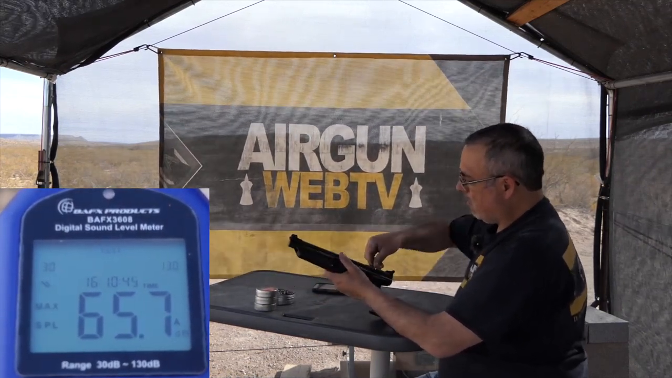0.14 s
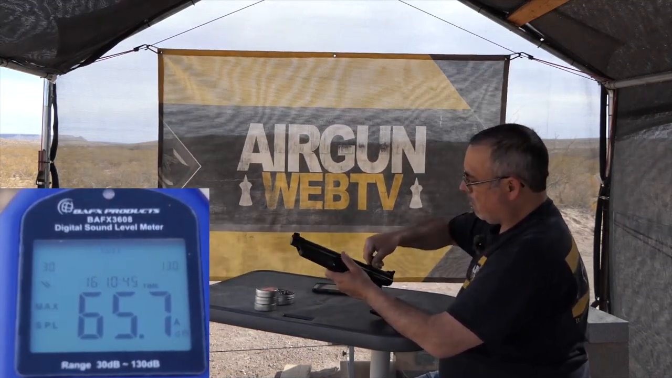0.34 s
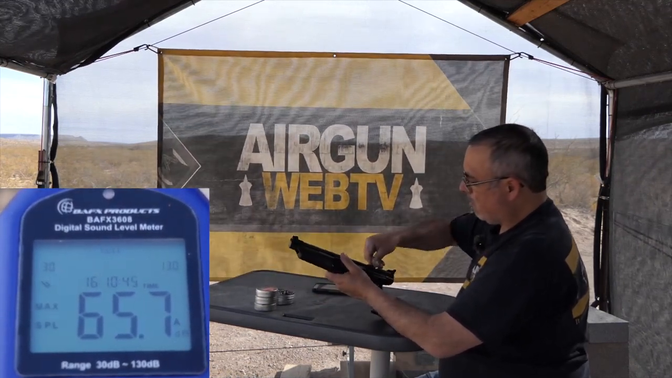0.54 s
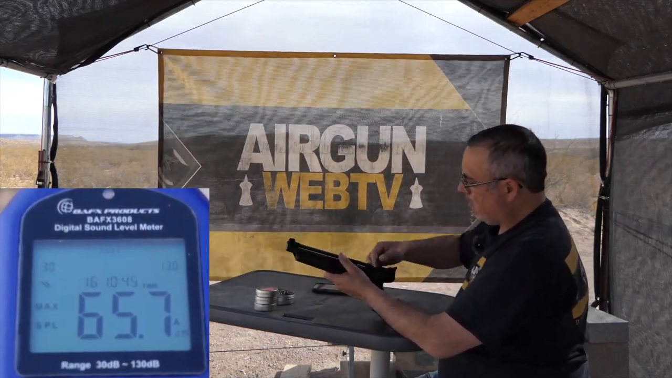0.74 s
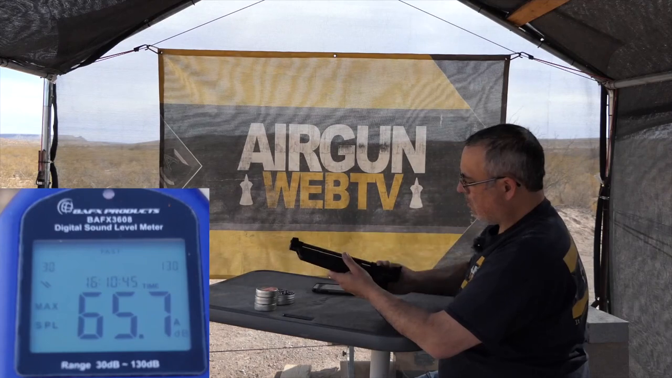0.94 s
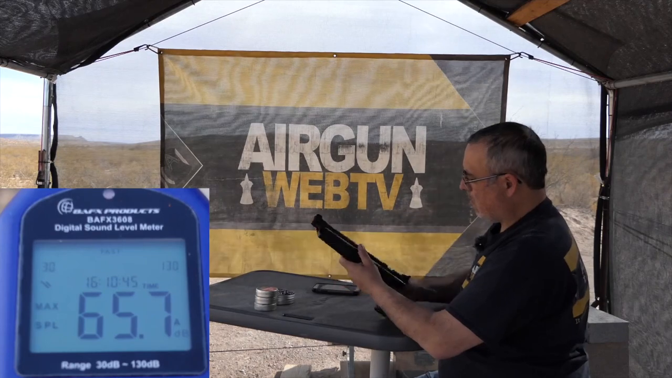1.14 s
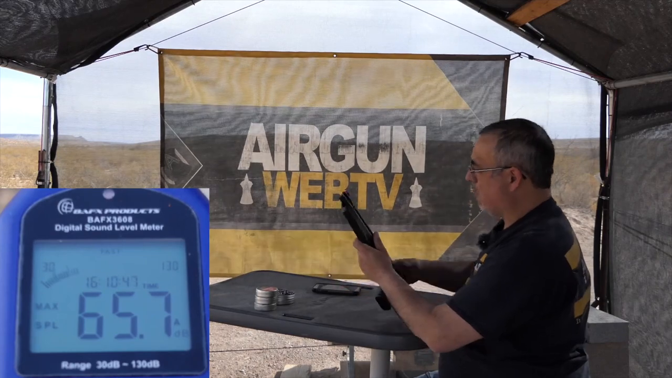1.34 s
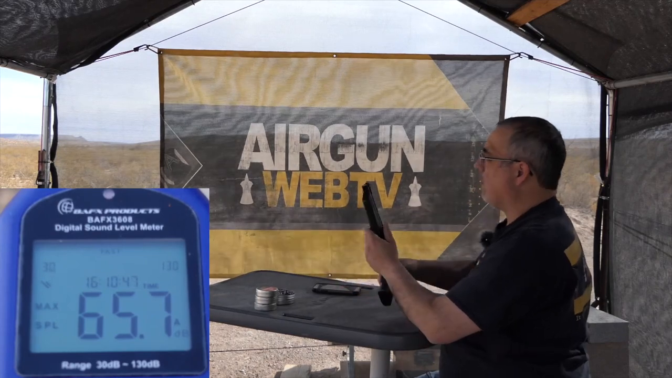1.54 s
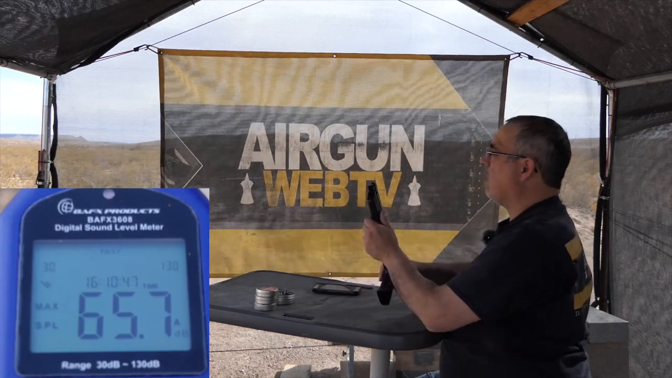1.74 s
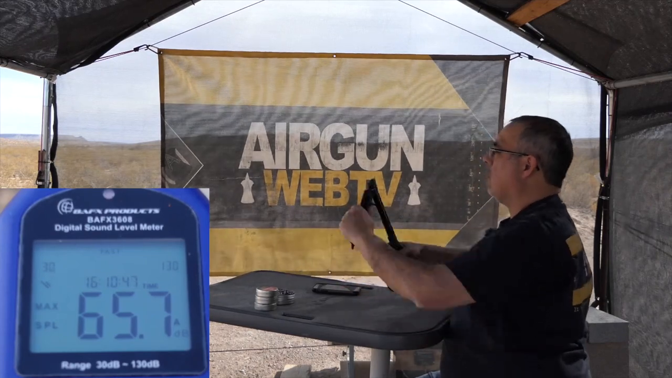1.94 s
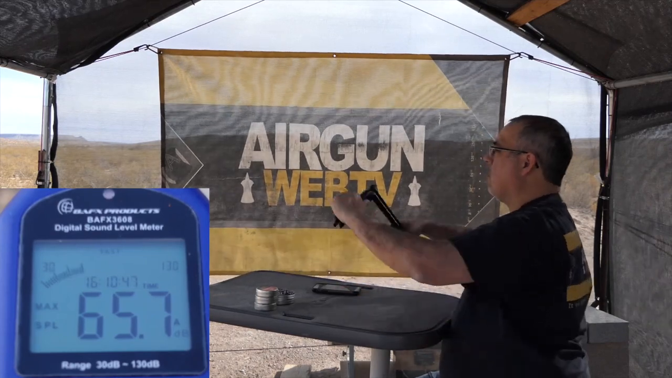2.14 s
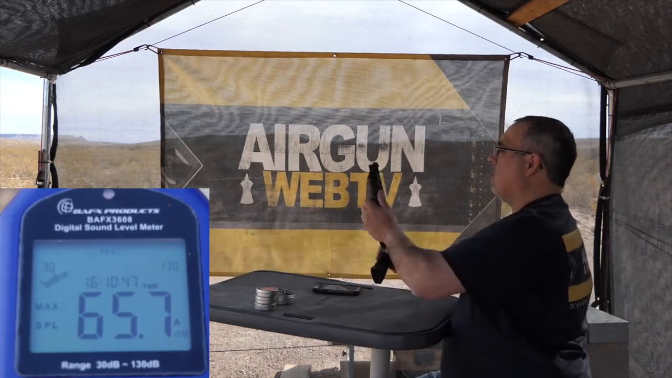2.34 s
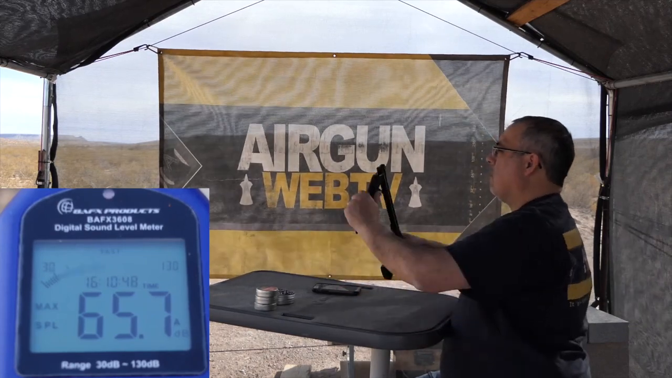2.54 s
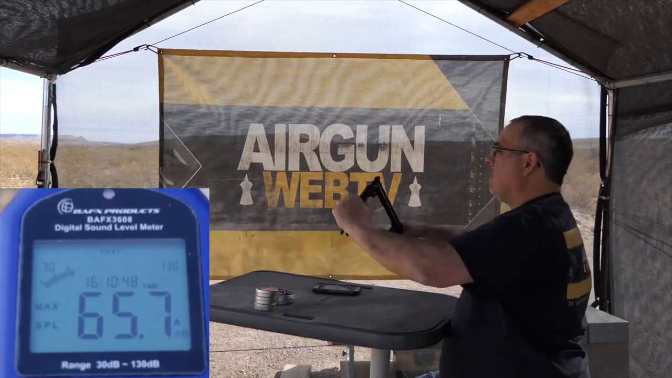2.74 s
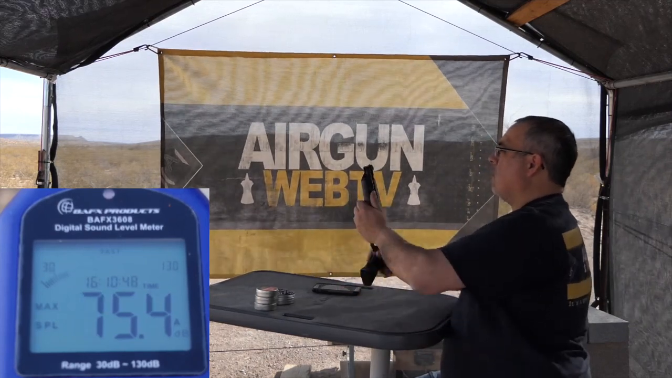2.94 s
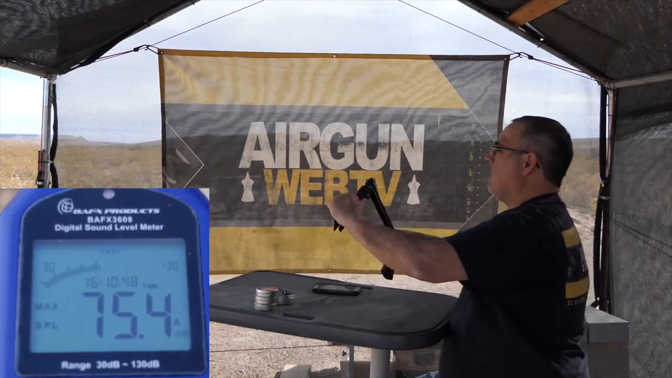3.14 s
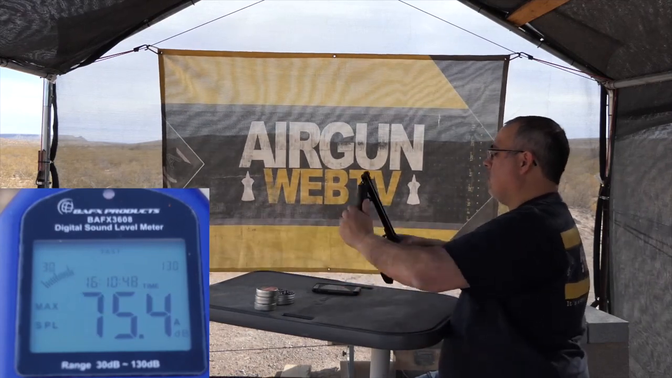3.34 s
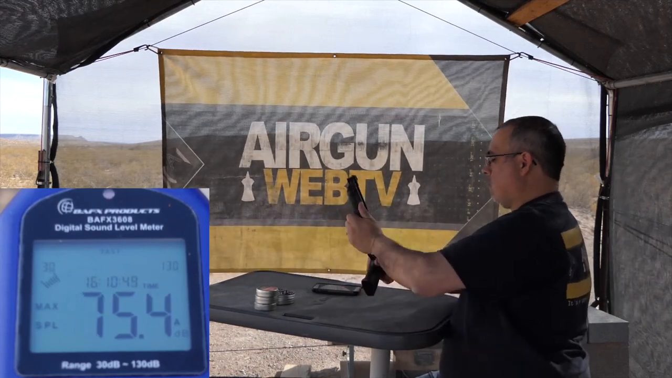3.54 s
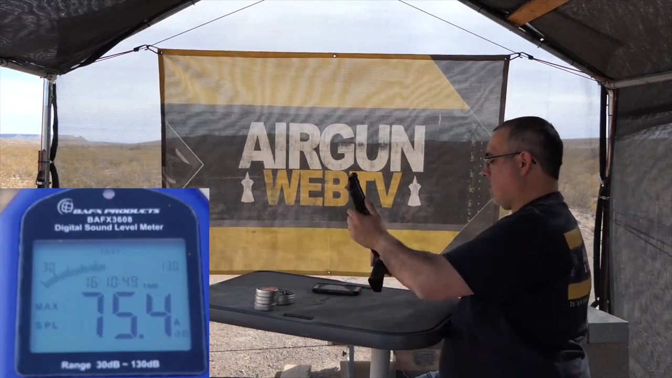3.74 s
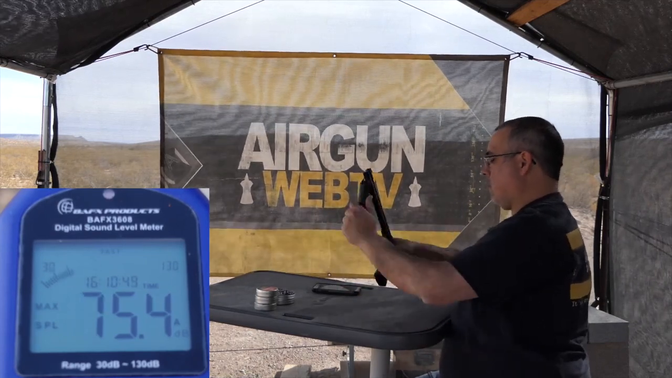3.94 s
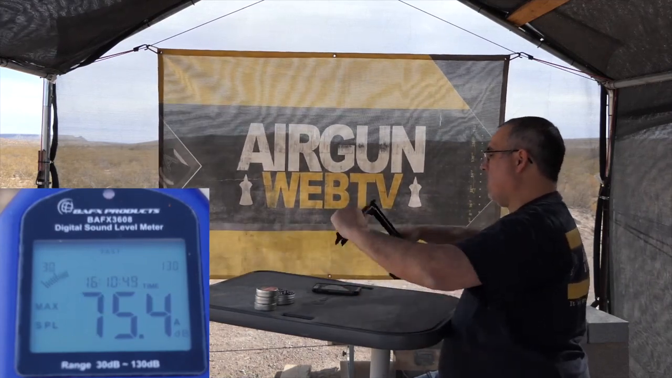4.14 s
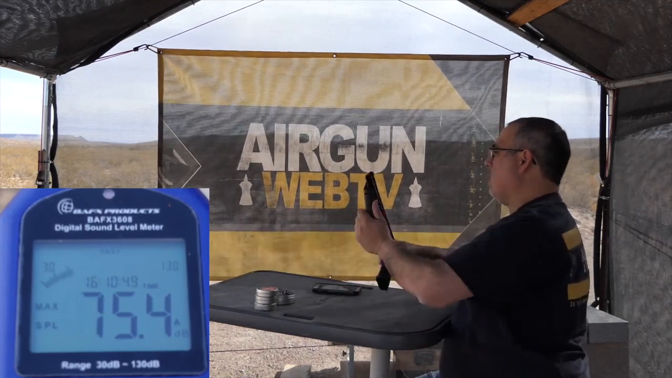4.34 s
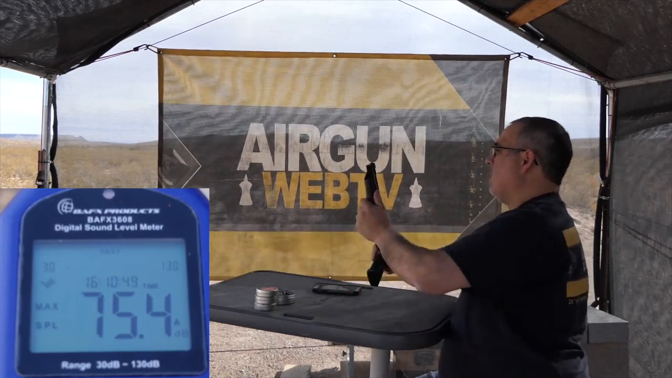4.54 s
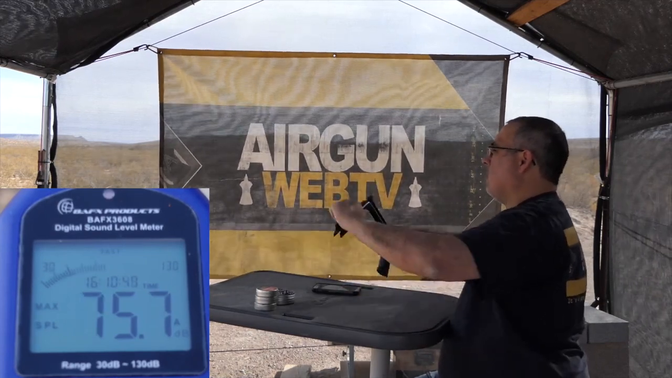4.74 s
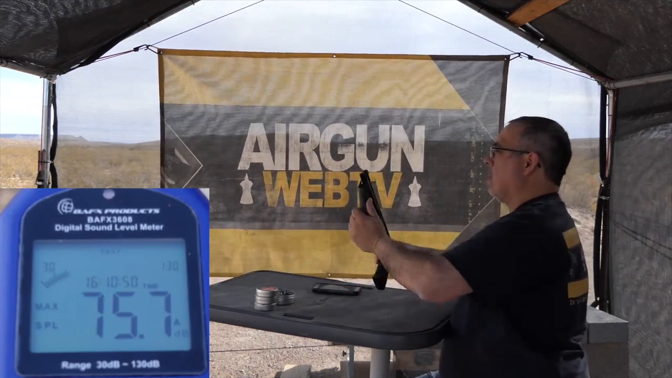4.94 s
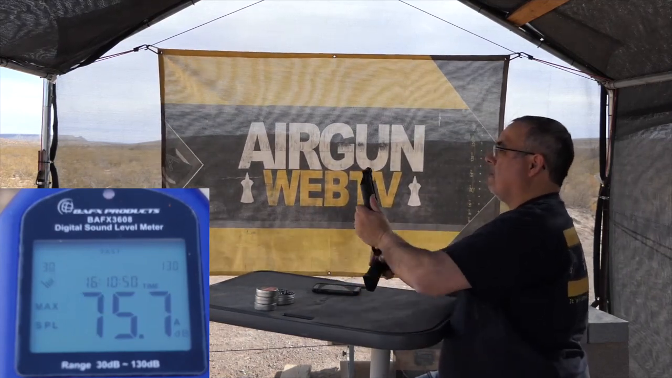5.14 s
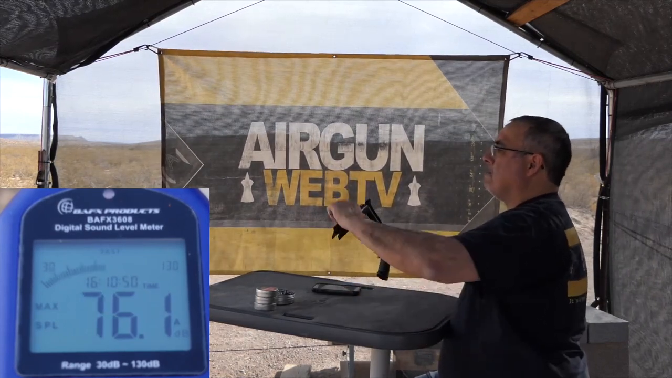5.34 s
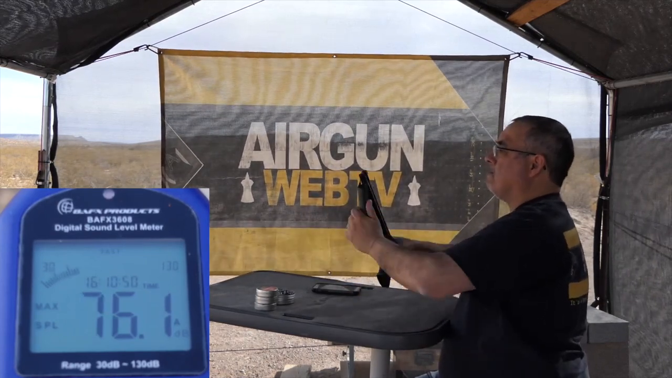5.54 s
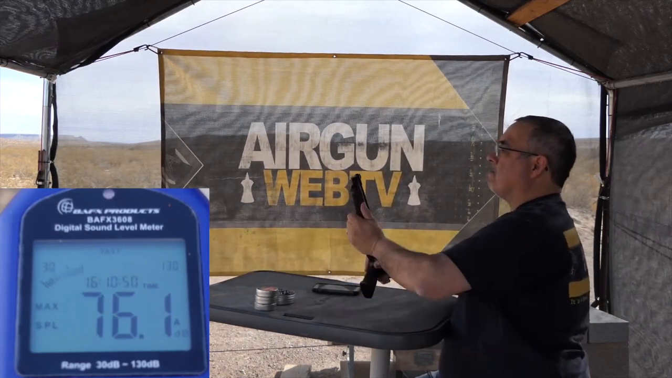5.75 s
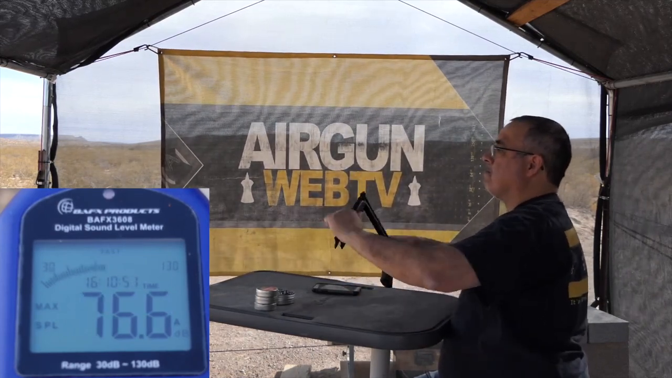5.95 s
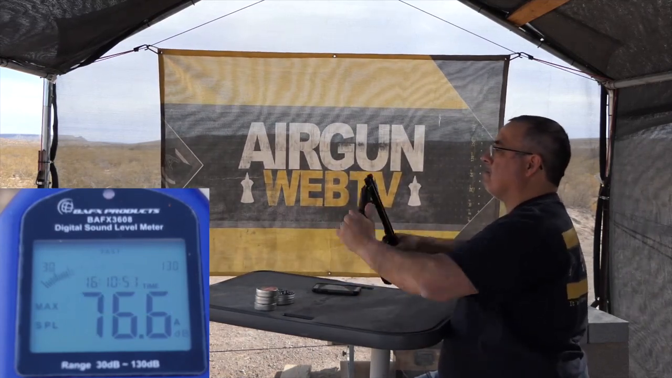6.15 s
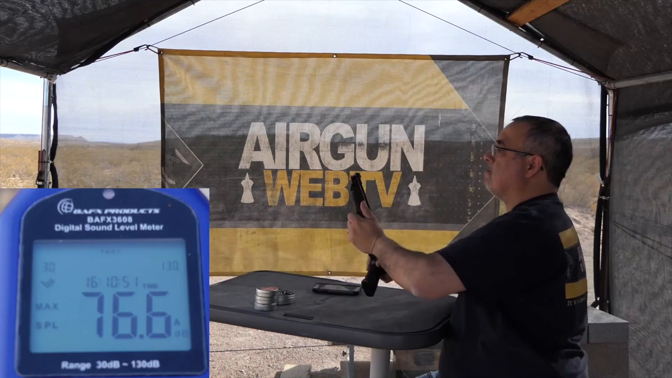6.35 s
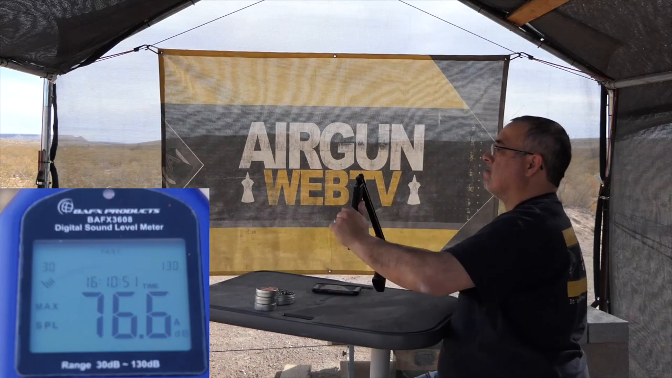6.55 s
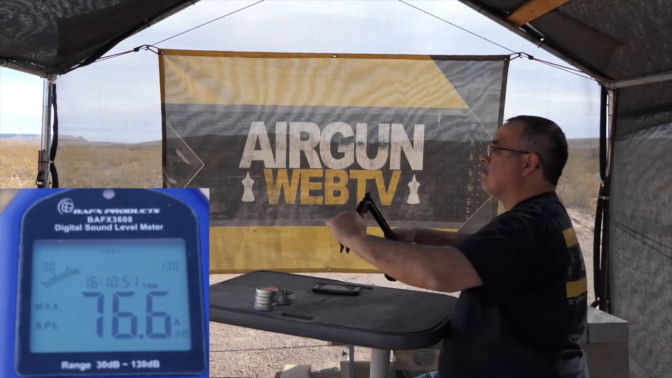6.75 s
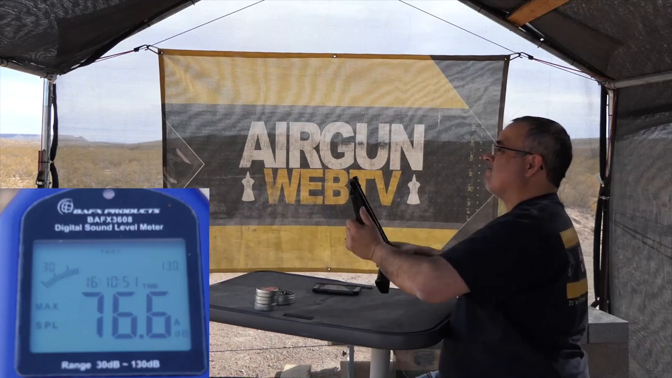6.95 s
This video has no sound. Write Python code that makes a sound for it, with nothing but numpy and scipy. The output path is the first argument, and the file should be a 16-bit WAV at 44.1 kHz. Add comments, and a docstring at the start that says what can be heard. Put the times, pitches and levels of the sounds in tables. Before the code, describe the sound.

An air pistol is loaded and pumped seven times outdoors, its lever rattling open and snapping shut with sharp clacks.

```python
"""A multi-pump air pistol is loaded and pumped seven times under a canvas shelter outdoors.
The bolt clicks home and a small object is put down on a plastic table. On each stroke the lever rattles
open and bumps its stop, chatters shut against the air pressure in ever quicker slips, and slams onto the
frame. Each click is a burst of noise ringing the hollow grip, the plastic frame and the steel parts.
Sleeves rustle with the arms, over faint air and a low rumble."""
import sys
import numpy as np
from scipy import signal
from scipy.fft import rfft, irfft
from scipy.io import wavfile

SR = 44100
rng = np.random.default_rng(int(sys.argv[2]) if len(sys.argv) > 2 else 0)


def master(y):
    """Save y as 16-bit WAV."""
    cut = np.clip(np.atleast_2d(y).T, -1, 1)
    pcm = np.round(cut * 32767)  # scale
    wavfile.write(sys.argv[1], SR, pcm.astype(np.int16))


N = 312669
TIME = np.arange(N) / SR
LEAD_S = .005   # a contact peaks this long after it starts
BOLT_HOME_S = 1.1204
LATCH_S, LATCH_DB = 1.9664, -17.5
# colours of light contacts: hollow_db, frame_db, steel_db
DULL, TICK = np.array([-16, 0, -21]), np.array([-9.5, 0, -6.5])

# resonances of the hollow grip, the plastic frame and the steel parts: pitch_hz, width_hz, level_db
HOLLOW = [(542, 95, -3.5), (660, 86, -0.5), (773, 110, 0), (1097, 390, -5)]
FRAME = [(1548, 143, -1.5), (1715, 196, 0), (1931, 216, 0.5), (2215, 334, -1.5), (2430, 290, -3),
         (2840, 320, -5), (3480, 360, -6.5), (4330, 630, -13.5)]
STEEL = [(5260, 880, -5), (6466, 450, 1), (7490, 420, 0.5), (8450, 550, 4), (8360, 410, 3), (9080, 280, -5),
         (9890, 520, -5), (11120, 480, -12.5)]
# low modes of the pistol bumping in the hand: pitch_hz, level_db, t60_s
THUD = [(22, -35.5, 0.18), (53, -28.5, 0.2), (140, -22.5, 0.048), (189, -43, 0.12)]
# body and treble spectra of cloth and air: frequency_hz, level_db
RUSTLE_LOW = [(250, -23), (350, -18), (500, -2.5), (750, 0.5), (1200, -1.5), (2200, -2), (3200, -4.5),
              (4500, -9.5), (6000, -19)]
RUSTLE_HIGH = [(3500, -13.5), (5000, -5), (7000, -2.5), (9500, -5), (11500, -10), (13000, -20)]
# the lever breaks free of the frame and its steel catch ticks: start_s, level_db, catch_db
RELEASES = [(2.6019, -32.5, -38), (3.166, -33, -57), (4.0236, -23.5, -31), (4.6896, -33.5, -38.5),
            (5.328, -32, -48), (5.9616, -31.5, -55), (6.6276, -30.5, -40.5)]
# the link flips over as the lever swings out: start_s, level_db, steel_offset_db
LINKS = [(2.6453, -29.5, -2.5), (3.2068, -27, -6), (4.0802, -24, -6.5), (4.7431, -29, 4),
         (5.3806, -28, 3.5), (6.0117, -26, -5), (6.6797, -26.5, -5)]
# the lever hits its open stop and ticks as the hand turns back: start_s, level_db, tick_delay_s, tick_db
STOPS = [(2.1689, -23.5, 0.11, -35), (2.7656, -28, 0.054, -39.5), (3.3134, -24, .055, -44),
         (4.2029, -23.5, 0.089, -40.5), (4.8502, -27, 0.061, -41.5), (5.4789, -19, .065, -43.5),
         (6.1134, -27, 0.059, -39), (6.781, -21, 0.059, -39.5)]
# the arm pushes the lever back until the piston takes up the air: click_s, click_db, sleeve_db
PUSHES = [(2.395, -32.5, -53), (2.948, -23, -52.5), (3.4967, -27.5, -52.5), (4.4213, -29.5, -52.5),
          (5.0352, -38, -56.5), (5.6641, -35, -56), (6.3052, -33, -56), (6.989, -32.5, -55)]
# closing strokes: start_s, slam_s, first_gap_s, slip_count, bite_gain_db, slam_gain_db, chatter_gain_db
STROKES = [(2.4187, 2.4737, .0105, 6, 3, -1, -2), (2.9805, 3.0409, .0103, 6, 1.5, -1, -5),
           (3.5810, 3.6457, .019, 5, -1, 1, -4), (4.4969, 4.5448, .013, 7, 0, 1, 1),
           (5.1415, 5.1829, .012, 7, 0, 1, 1), (5.7647, 5.8111, .013, 6, -1.5, 1, 0),
           (6.4331, 6.4709, .011, 6, -1.5, 1, 0)]


def from_db(db):
    """Decibels to gain."""
    return 10 ** (np.asarray(db) / 20)


def add(track, start_s, sound):
    """Mix a sound into the track."""
    i = round(start_s * SR)
    track[i:i + len(sound)] += sound[:N - i]


def noise(spectrum):
    """Noise of rms 1 with the given colour."""
    hz, db = np.transpose(spectrum)
    bins_hz = np.fft.rfftfreq(N, 1 / SR) + 1e-9
    colour_db = np.interp(np.log(bins_hz), np.log(hz), db, left=-200, right=-200)
    x = irfft(rfft(rng.standard_normal(N)) * from_db(colour_db), N)
    return x / x.std()


def resonate(x, hz, width_hz):
    """Two-pole resonance with gain 1 at its peak."""
    r = np.exp(-np.pi * width_hz / SR)
    feedback = [1, -2 * r * np.cos(2 * np.pi * hz / SR), r * r]
    return signal.lfilter(np.array([1, 0, -1]) * (1 - r * r) / 2, feedback, x + 1e-18)


def ring(force, modes, spread_db, detune):
    """A force drives a set of resonances, whose mix and pitch shift with the point of contact."""
    out = 0
    for k, (hz, width_hz, db) in enumerate(modes):
        gain = (-1) ** k * from_db(db + spread_db * rng.normal())
        out += gain * resonate(force, hz * (1 + detune * rng.normal()), width_hz)
    return out


def struck(modes, spread_db):
    """A struck body rings in decaying sines, their balance different on every hit."""
    t = TIME[:SR]
    return sum(from_db(db + spread_db * rng.normal() - 60 * t / t60_s) * np.sin(2 * np.pi * hz * t)
               for hz, db, t60_s in modes)


def crunch(width_s, buzz_db=-24, buzz_s=.005, skirt_db=-14):
    """Rough faces graze, meet and part in a swell of tiny impacts; loose parts buzz on briefly."""
    t = TIME[:SR // 16] - LEAD_S
    swell = np.exp(-(t / width_s) ** 2) + from_db(skirt_db) * np.exp(-np.abs(t) / width_s)
    buzz = from_db(buzz_db) * (t > 0) * np.exp(-np.abs(t) / buzz_s)
    return rng.standard_normal(len(t)) * (swell + buzz)


def click(levels_db, width_s=.0014, spread_db=3, detune=.033, damping=1):
    """One contact rings grip, frame and steel, each at its own level; damping widens the resonances."""
    _, frame_db, steel_db = levels_db
    # a soft contact that spares the steel also favours the lower modes
    db_per_octave = np.clip((steel_db - frame_db + 2) * .5, -9, 2)
    out = 0
    for modes, part_db in zip((HOLLOW, FRAME, STEEL), levels_db):
        tilted = [(hz, width_hz * damping, db + db_per_octave * np.log2(hz / modes[0][0]))
                  for hz, width_hz, db in modes]
        sound = ring(crunch(width_s), tilted, spread_db, detune)
        rms_over_5ms = np.sqrt(np.sum(sound ** 2) / (.005 * SR))
        out += from_db(part_db) * sound / rms_over_5ms
    return out


def rattle(db, colour, bounce_colour, count, gap_s, first_loss_db, loss_db):
    """A hard hit and the run of fading bounces that follows it."""
    out = np.zeros(N)
    add(out, 0, click(db + np.array(colour)))
    for k, (jitter, accent_db) in enumerate(rng.standard_normal((count, 2))):
        bounce_db = db - first_loss_db - k * loss_db + accent_db
        add(out, gap_s * (k + 1 + .15 * jitter), click(bounce_db + np.array(bounce_colour)))
    return out[:SR // 4]


def outdoor_air(air_db=-65, hiss_db=-70, rumble_db=-50, sway_db=-39):
    """Faint air over a low rumble; a deep sway joins in once the pumping starts."""
    # spectra of the rumble and the sub-bass sway: frequency_hz, level_db
    rumble = [(15, -1.5), (30, 6.5), (50, -6.5), (65, -4.5), (85, -21.5), (125, -16.5), (180, -17.5),
              (300, -34.5), (500, -50)]
    sway = [(6, -30.5), (12, -2.5), (18, 17.5), (26, -6.5), (45, -27), (80, -41.5)]
    pumping = np.interp(TIME, [2, 2.5], [0, 1])
    air = from_db(air_db) * noise(RUSTLE_LOW) + from_db(hiss_db) * noise(RUSTLE_HIGH)
    return air + from_db(rumble_db) * noise(rumble) + from_db(sway_db) * pumping * noise(sway)


def swing(start_s, end_s, swell_s=.12, sag_db_per_s=6.5, fade_s=.12):
    """Speed of one arm movement, 0 to 1: it swells, sags while it lasts and dies away."""
    age = np.maximum(TIME - start_s, 0)
    fade = np.clip(1 - (TIME - end_s) / fade_s, 0, 1)
    return np.minimum(age / swell_s, 1) * from_db(-sag_db_per_s * age) * fade


def sleeves(pull_db=-55, pull_treble_db=-6.5, push_treble_db=-2.5, turn_s=.051,
            cloth_db=-1, swish_db=-3, flutter_db=2):
    """Cloth rustles and swishes with the speed of the arms as they reach, pull and push."""
    # the arms load and raise the pistol: start_s, end_s, level_db, treble_offset_db
    reaches = [(0.02, .42, -56, -3), (0.436, 1.16, -60.5, -2.5), (1.38, 1.645, -57, -2),
               (1.672, 2.188, -53.5, -4)]
    # resonances of the swishing cloth: pitch_hz, width_hz, level_db
    swishes = [(720, 230, -4), (2260, 620, 1), (3400, 300, -5.5)]
    push_ends_s = [slam_s for slam_s, *_ in STROKES] + [TIME[-1]]
    moves = [(swing(start_s, end_s), db, treble_db) for start_s, end_s, db, treble_db in reaches]
    for (free_s, *_), (stop_s, *_) in zip(RELEASES, STOPS[1:]):
        moves.append((swing(free_s, stop_s, swell_s=.035), pull_db, pull_treble_db))
    for (stop_s, *_), (_, _, push_db), end_s in zip(STOPS, PUSHES, push_ends_s):
        moves.append((swing(stop_s + turn_s, end_s), push_db, push_treble_db))
    body_gain = sum(speed * from_db(db) for speed, db, _ in moves)
    treble_gain = sum(speed * from_db(db + treble_db) for speed, db, treble_db in moves)
    swish = sum(from_db(db) * resonate(rng.standard_normal(N), hz, width) for hz, width, db in swishes)
    flutter = from_db(flutter_db * noise([(5, 0), (30, -5), (200, -21.5)]))
    body = from_db(cloth_db) * noise(RUSTLE_LOW) + from_db(swish_db) * swish / swish.std()
    return flutter * (body_gain * body + treble_gain * noise(RUSTLE_HIGH))


def loading(bump_s=.5337, bump_db=-8, bolt_db=(-33, -15.5, -25), give_db=(-38, -23, -20), give_s=.0065):
    """The pistol bumps in the hand, the bolt clicks home, the stiff latch gives and then clacks open."""
    # the hands grip the bolt and shift on the pistol: start_s, level_db, hollow_offset_db, steel_offset_db
    handling = [(0.5695, -42, -13, -8.5), (1.0177, -30, -14, -15), (1.7527, -42.5, 6, -11),
                (1.7916, -46, -3, -12), (2.069, -44.5, -24, -14), (3.9425, -46.5, -9, -5),
                (4.2252, -39, -16, -7), (4.2357, -37.5, -9, -6), (4.2516, -46, -5, 5),
                (4.3524, -41, -9, -22), (6.8976, -43, -7, -14)]
    out = np.zeros(N)
    add(out, bump_s, from_db(bump_db) * struck(THUD, spread_db=2))
    for s, db, hollow_db, steel_db in handling:
        add(out, s - LEAD_S, click(db + np.array([hollow_db, 0, steel_db])))
    add(out, BOLT_HOME_S - LEAD_S, click(bolt_db, width_s=.0032))
    add(out, LATCH_S - give_s - LEAD_S, click(give_db, width_s=.001))
    clack = rattle(LATCH_DB, colour=(-25.5, 0, 1), bounce_colour=(-11.5, 0, -5.5),
                   count=5, gap_s=.0054, first_loss_db=6, loss_db=1.5)
    add(out, LATCH_S - LEAD_S, clack)
    return out


def table_knocks(crack_db=-25, rattle_db=-34, rattle_t60_s=.23, rattle_hz=(450, 1050)):
    """Something hard is set down on the hollow plastic top, which rattles as it settles."""
    # knocks on the top: start_s, level_db
    knocks = [(.533, -21), (1.2104, -11), (1.2118, 0), (1.228, -16), (1.284, -27), (1.292, -22)]
    # modes of the top: pitch_hz, level_db, t60_s
    top_modes = [(43, -31, .24), (129, -20, .1), (175, -28, .06), (330, -37, .03), (540, -41, .04),
                 (657, -35, .08), (743, -19, .06), (829, -24, .07), (1020, -19, .025), (1230, -16, .02),
                 (1459, -21, .04), (2067, -17, .018), (2417, -23, .015), (4200, -31, .01)]
    out, t = np.zeros(N), TIME[:SR // 4]
    band = signal.butter(2, rattle_hz, "band", fs=SR, output="sos")
    for s, db in knocks:
        settling = signal.sosfilt(band, rng.standard_normal(len(t)))
        add(out, s, from_db(db) * struck(top_modes, spread_db=3))
        add(out, s, from_db(db + rattle_db - 60 * t / rattle_t60_s) * settling / settling.std())
        # soft touches crack less
        add(out, s - LEAD_S, from_db(2 * db + crack_db) * crunch(width_s=.0005))
    return out


def scrapes(grains_per_s=2200, size_spread_db=2.5, hollow_db=-10):
    """Sliding faces catch in dense uneven grains, harder as the part gathers speed."""
    # bolt, latch and lever joints slide: start_s, end_s, level_db, steel_offset_db
    slides = [(1.042, BOLT_HOME_S, -40.5, -5), (LATCH_S - .011, LATCH_S, LATCH_DB - 10, 1)]
    slides += [(s - .0079, s + .017, db - 12, -7) for s, db, _ in RELEASES]
    slides += [(s - .0038, s, db - 15, -3) for s, db, _ in LINKS]
    slides += [(s - .027, s, -43, -7) for s, *_ in STOPS]
    out, t = np.zeros(N), TIME[:SR // 6]
    for start_s, end_s, db, steel_db in slides:
        speed = np.interp(t + start_s, [start_s, end_s, end_s + .013], [.35, 1, 0])
        catches = rng.random(len(t)) < grains_per_s / SR
        grains = catches * rng.standard_normal(len(t))
        grains *= from_db(size_spread_db * rng.standard_normal(len(t)))
        for modes, part_db in ((HOLLOW, hollow_db), (FRAME, 0), (STEEL, steel_db)):
            sound = ring(grains, modes, spread_db=1, detune=.027)
            add(out, start_s, from_db(db + part_db) * speed * sound / sound.std())
    return out


def lever_opening(squeak_s=.016, squeak_db=-3, catch_s=.0125, catch_colour=(-3, -1, 2.3),
                  link_hollow_db=-12.5, settle_s=.026, settle_db=-14, thud_db=-4.5):
    """The lever breaks free, the link flips and settles, then the lever thuds and bounces on its stop."""
    # the hollow grip rings at the stop: pitch_hz, level_db, t60_s
    grip_modes = [(564, -46.5, 0.089), (777, -39, 0.063), (1079, -38.5, 0.077)]
    out = np.zeros(N)
    for s, db, catch_db in RELEASES:
        add(out, s - LEAD_S, click(db + DULL))
        add(out, s - squeak_s + LEAD_S / 2, from_db(db + squeak_db) * squeak(squeak_s))
        add(out, s + catch_s - LEAD_S, click(catch_db + np.array(catch_colour)))
    for s, db, steel_db in LINKS:
        add(out, s - LEAD_S, click(db + np.array([link_hollow_db, 0, steel_db]), width_s=.002))
        add(out, s + settle_s * rng.uniform(.8, 1.5) - LEAD_S, click(db + settle_db + TICK))
    for s, db, tick_delay_s, tick_db in STOPS:
        bounces = rattle(db, colour=(-12.5, 0, -3.5), bounce_colour=(-2.5, 0, -3.5),
                         count=3, gap_s=.004, first_loss_db=8, loss_db=4)
        add(out, s - LEAD_S, bounces)
        add(out, s, from_db(thud_db) * struck(THUD, spread_db=1))
        add(out, s, struck(grip_modes, spread_db=4))
        add(out, s + tick_delay_s - LEAD_S, click(tick_db + TICK))
    return out


def piston():
    """A dull click as the piston starts to press on the air."""
    out = np.zeros(N)
    for s, db, _ in PUSHES:
        add(out, s - LEAD_S, click(db + DULL))
    return out


def lever_closing(bite_db=(-37, -24, -19.5), early_db=(-41, -26, -24), late_db=(-35, -17, -25),
                  touch_db=(-32, -21, -19), slam_db=(-22.5, -10.5, -13.5), thud_db=-10, rub_db=-31,
                  last_slip_s=.0066, quicken=.7, touch_s=.0044):
    """Against the air the lever sticks and slips, ever quicker and duller, then snaps onto the frame."""
    # the lever arm barks and the steel spring rings on at each slam: pitch_hz, level_db, t60_s
    arm_modes = [(1780, -8.5, .015), (2100, -8, 0.011)]
    spring_modes = [(1895, -61, 1.0), (2498, -65, .38), (3015, -58, .28), (3758, -70, .8), (4167, -66, .36),
                    (4231, -68, .26)]
    out = np.zeros(N)
    for start_s, slam_s, gap_s, slip_count, bite_gain_db, slam_gain_db, chatter_gain_db in STROKES:
        bite = click(np.array(bite_db) + bite_gain_db, width_s=.0011, spread_db=2.5, detune=.015)
        add(out, start_s - LEAD_S, bite)
        chatter_s = slam_s - last_slip_s - start_s - gap_s
        for progress in np.linspace(0, 1, slip_count):
            slip_s = start_s + gap_s + chatter_s * progress ** quicken + rng.normal(0, .0005)
            slip_db = np.array(early_db) * (1 - progress) + (np.array(late_db) + chatter_gain_db) * progress
            slip = click(slip_db + rng.normal(0, 1), width_s=.0012, spread_db=2, detune=.012)
            add(out, slip_s - LEAD_S, slip)
        # between slips the faces keep rubbing, harder as the pressure builds
        pressure = np.linspace(.4, 1, round((slam_s - start_s) * SR))
        for modes in (FRAME, STEEL):
            rub = ring(rng.standard_normal(SR // 8), modes, spread_db=2, detune=.01)[:len(pressure)]
            add(out, start_s, from_db(rub_db) * pressure * rub / rub.std())
        # lever and frame touch, then slam; pressed together they damp each other
        touch = click(touch_db, width_s=.001, spread_db=2, detune=.012, damping=2)
        slam = click(slam_db, width_s=.0011, spread_db=1.5, detune=.012, damping=1.9)
        force = from_db(slam_gain_db)
        add(out, slam_s - touch_s - LEAD_S, touch)
        add(out, slam_s - LEAD_S, force * slam)
        add(out, slam_s - touch_s, force * from_db(thud_db) * struck(THUD[2:], spread_db=4))
        add(out, slam_s - .001, force * struck(arm_modes, spread_db=1))
        add(out, slam_s, struck(spring_modes, spread_db=2))
    return out


def squeak(glide_s, glide_hz=(1124, 2396), width_hz=430):
    """The lever's tip rubs out of its seat: a rough tone that glides up and swells."""
    t = TIME[:SR // 16]
    hz = np.interp(t, [0, glide_s], glide_hz)
    grit = rng.standard_normal(len(t)) + 1j * rng.standard_normal(len(t))
    wobble = signal.sosfilt(signal.butter(2, width_hz / 2, fs=SR, output="sos"), grit)
    tone = np.real(wobble * np.exp(2j * np.pi * np.cumsum(hz) / SR))
    swell = np.interp(t / glide_s, [0, .5, .9, 1.15], [.33, .33, 1, .041])
    return swell * tone / tone.std()


def loose_joints(ticks_per_s=14, tick_db=-48, spread_db=3, chances=16):
    """Slack in the joints ticks faintly at random while the lever is out."""
    out = np.zeros(N)
    for (free_s, *_), (_, slam_s, *_) in zip(RELEASES, STROKES[1:]):
        open_s = slam_s - free_s
        for place, luck, size in rng.random((chances, 3)):
            if luck < ticks_per_s * open_s / chances:
                add(out, free_s + place * open_s, click(tick_db + spread_db * (2 * size - 1) + TICK))
    return out


def shelter(x, t60_s=.06, delay_s=.006, canvas_hz=7000):
    """Canvas, table and ground send back a short, dull scatter."""
    t = TIME[:SR // 4]
    echoes = rng.standard_normal(len(t)) * from_db(-60 * t / t60_s) * (t > delay_s)
    echoes = signal.sosfilt(signal.butter(1, canvas_hz, fs=SR, output="sos"), echoes)
    return signal.fftconvolve(x, echoes / np.linalg.norm(echoes))[:N]


def scene(echo_db=-29, width_db=-29):
    """Everything is close and central; a faint, dull, smeared copy of the whole mix is added to one channel and
    taken from the other, so the two differ slightly."""
    pistol = loading() + lever_opening() + piston() + loose_joints() + scrapes() + lever_closing()
    direct = pistol + table_knocks()
    mid = direct + from_db(echo_db) * shelter(direct) + sleeves() + outdoor_air()
    side = from_db(width_db) * shelter(mid)
    return np.array([mid + side, mid - side])


def record(dry, mic_top_hz=11700, knee=4, cutoff_hz=16000):
    """The microphone loses the highest treble, the slams just overload, and the top is cut."""
    x = signal.sosfilt(signal.ellip(8, .5, 70, mic_top_hz, fs=SR, output="sos"), dry)
    x = x / (1 + np.abs(x) ** knee) ** (1 / knee)
    return signal.sosfilt(signal.cheby2(12, 70, cutoff_hz, fs=SR, output="sos"), x)


dry = scene()
out = record(dry)
master(out)
```